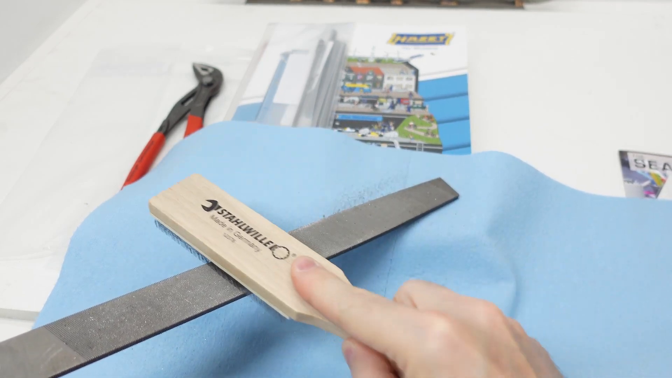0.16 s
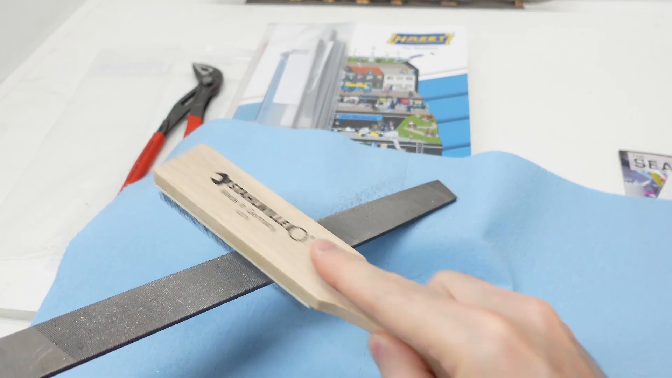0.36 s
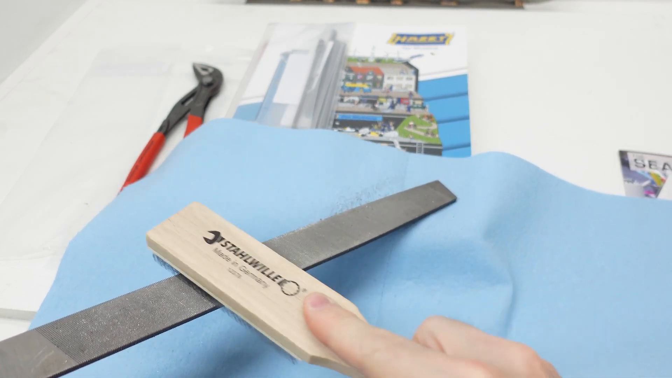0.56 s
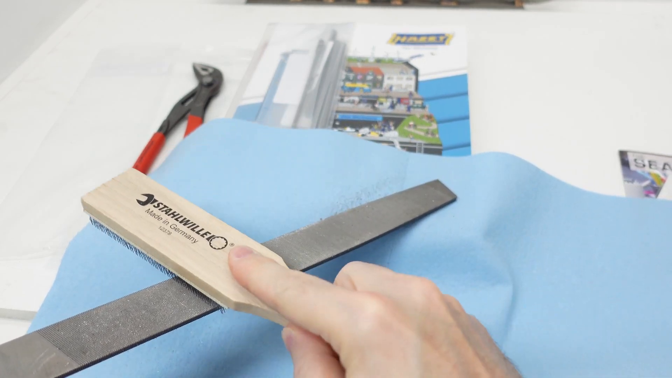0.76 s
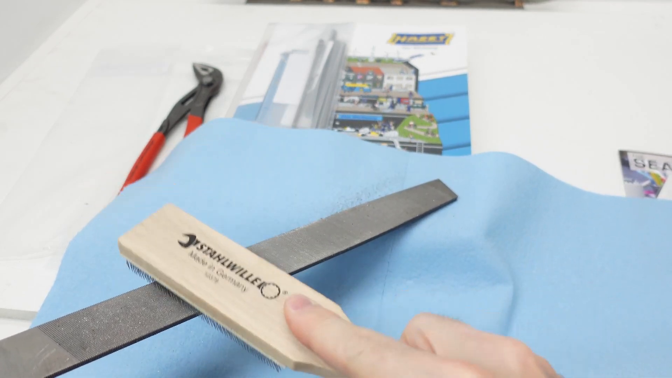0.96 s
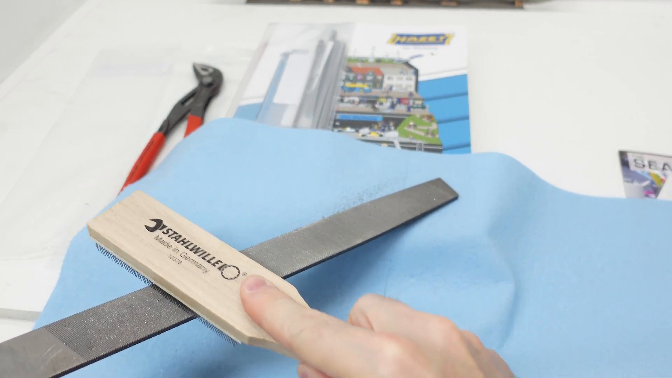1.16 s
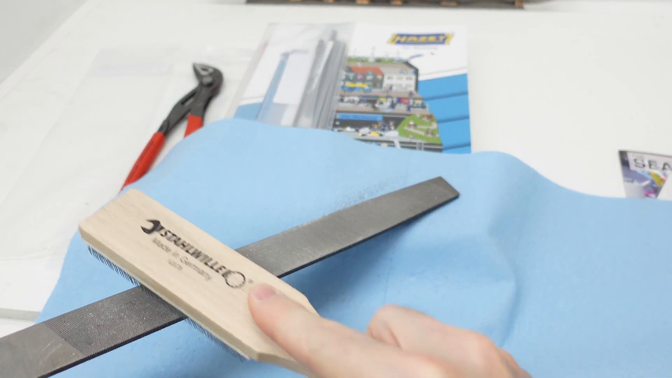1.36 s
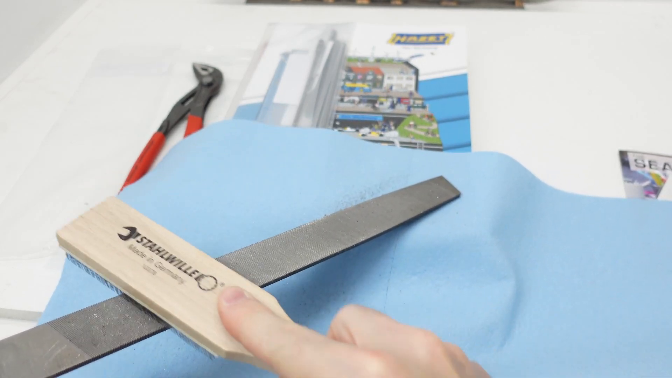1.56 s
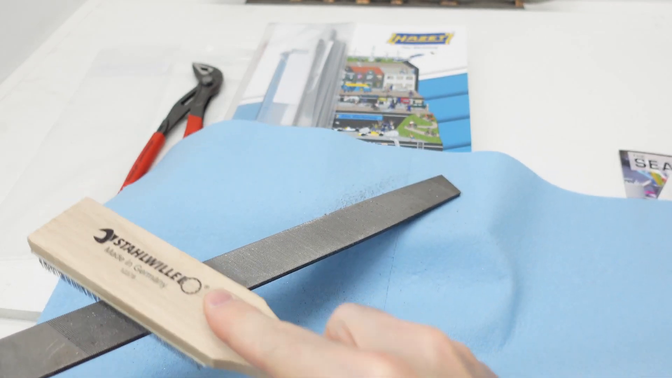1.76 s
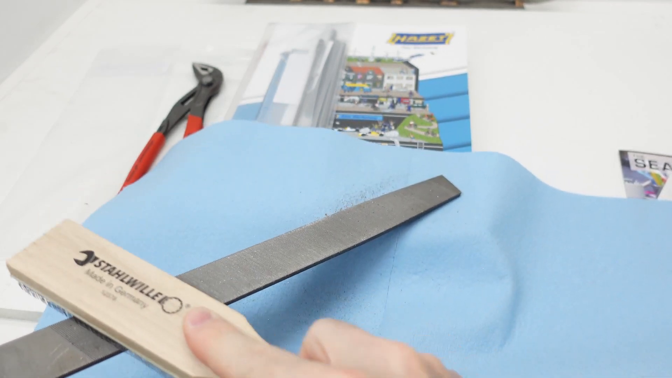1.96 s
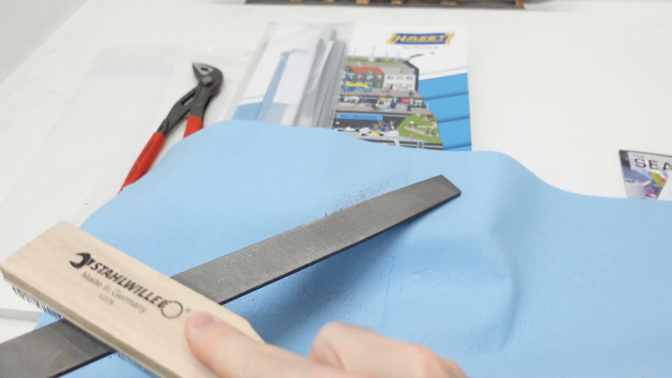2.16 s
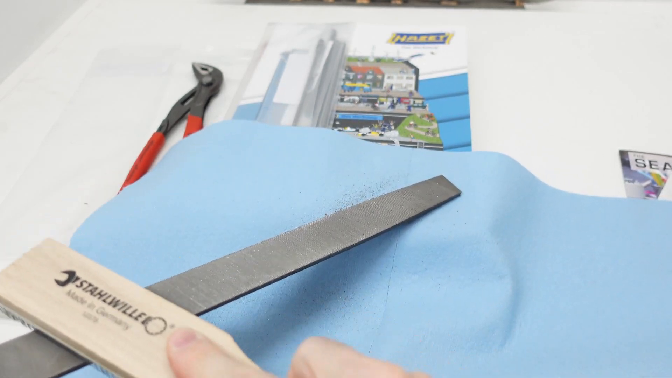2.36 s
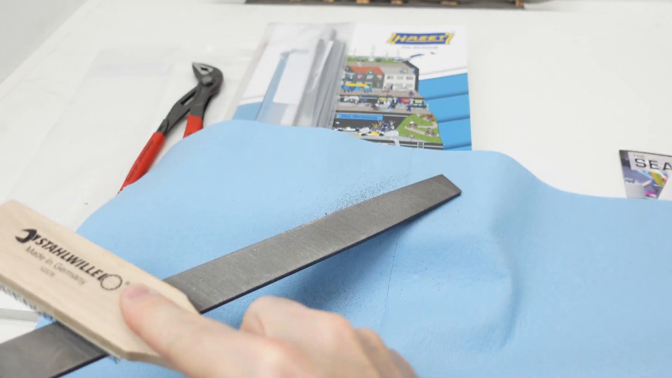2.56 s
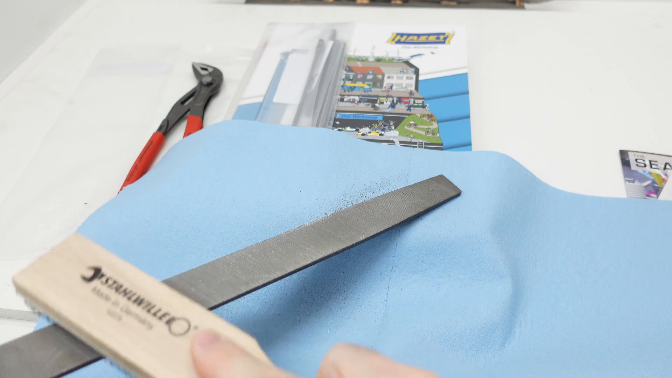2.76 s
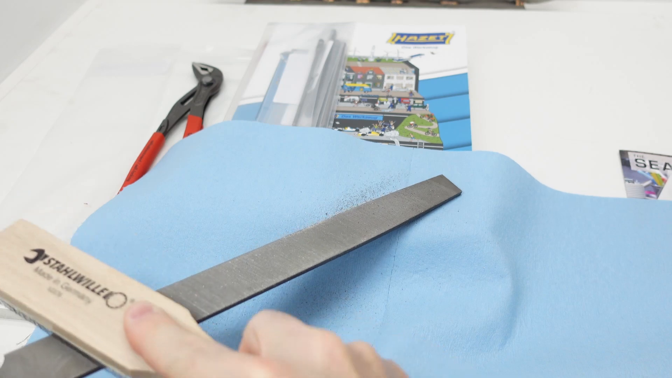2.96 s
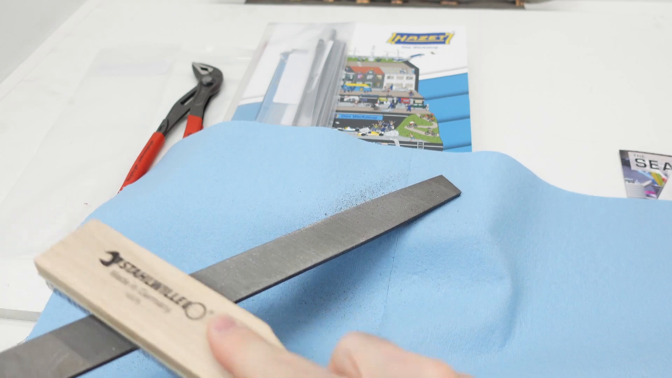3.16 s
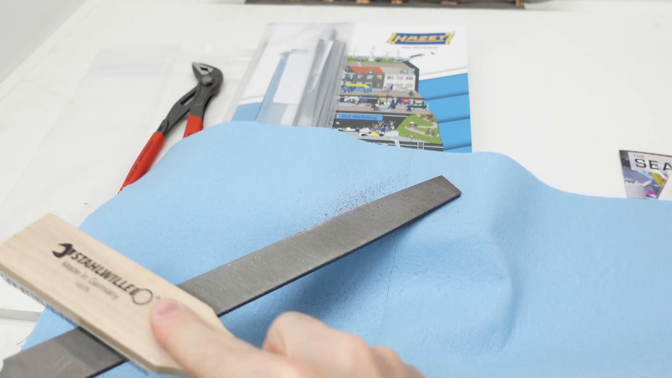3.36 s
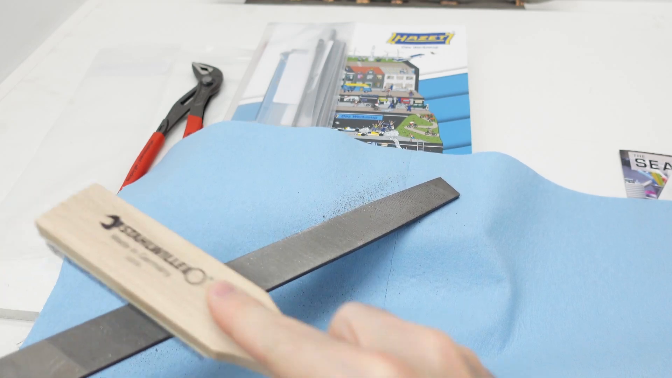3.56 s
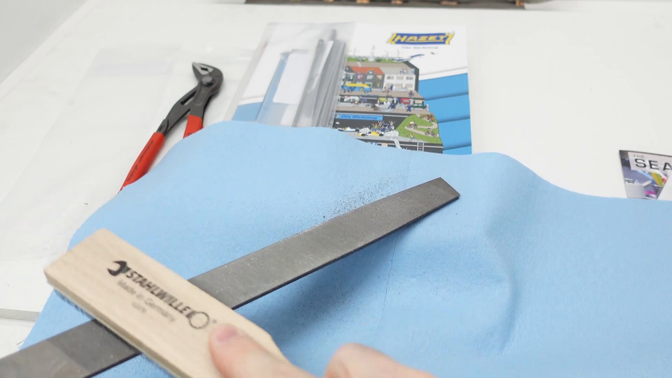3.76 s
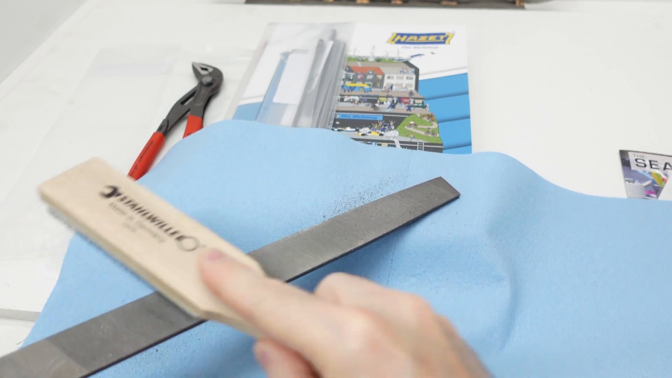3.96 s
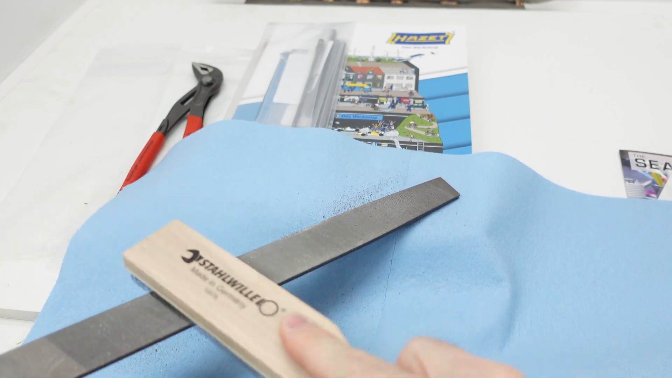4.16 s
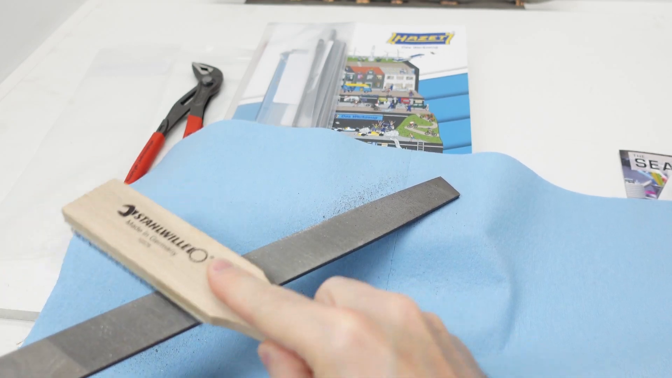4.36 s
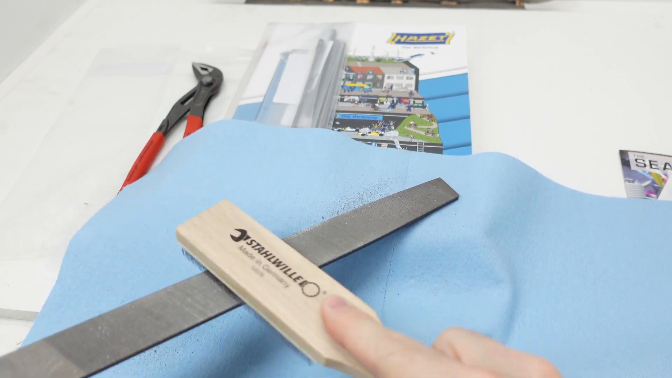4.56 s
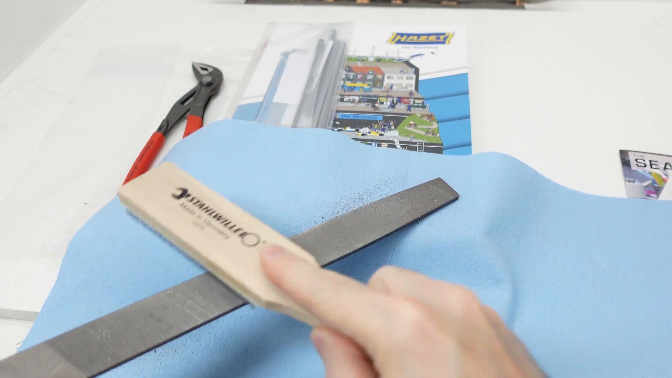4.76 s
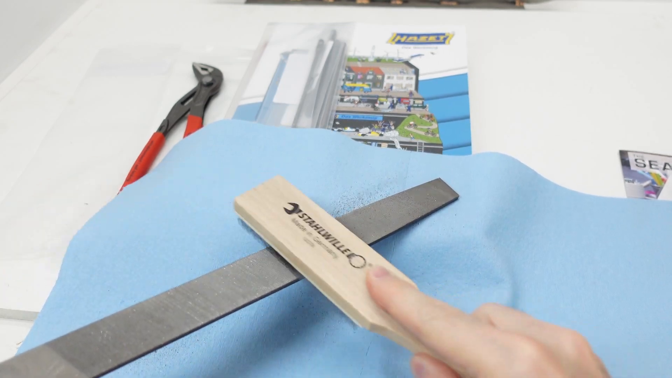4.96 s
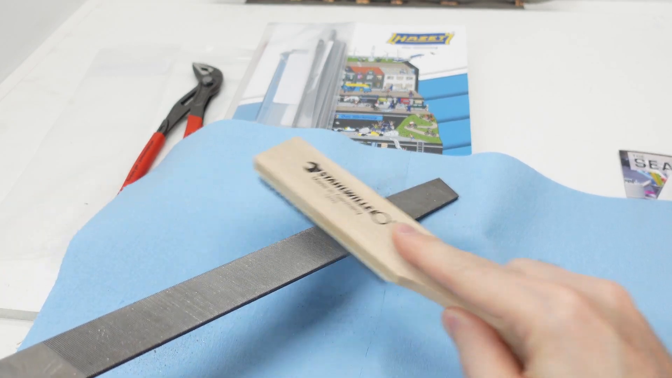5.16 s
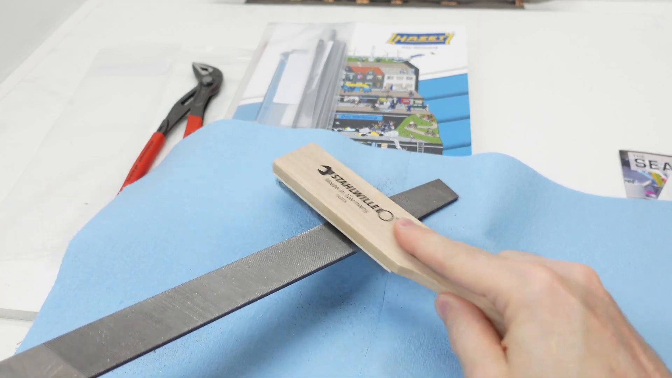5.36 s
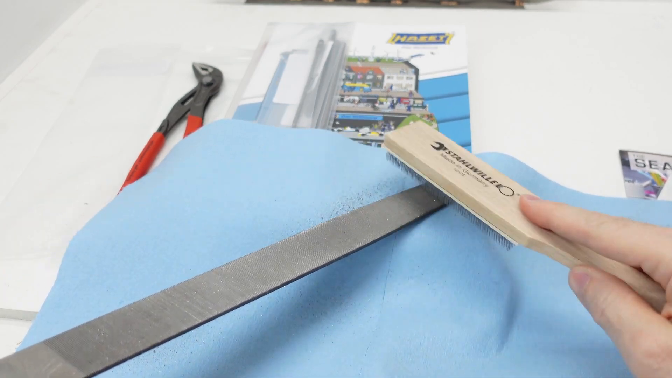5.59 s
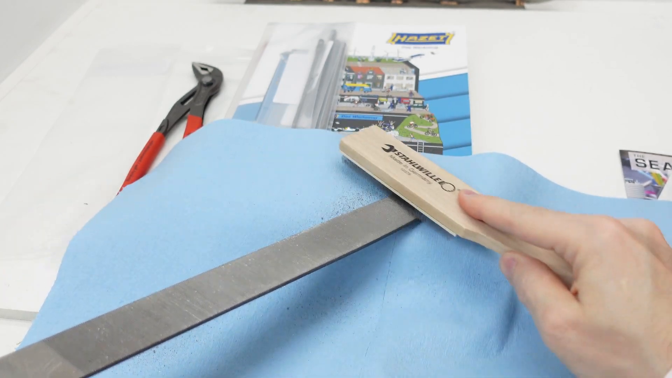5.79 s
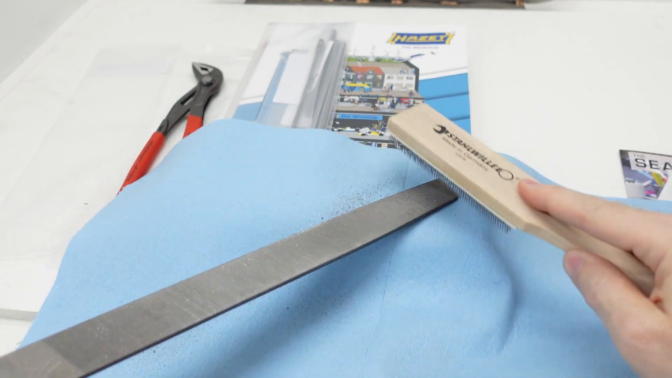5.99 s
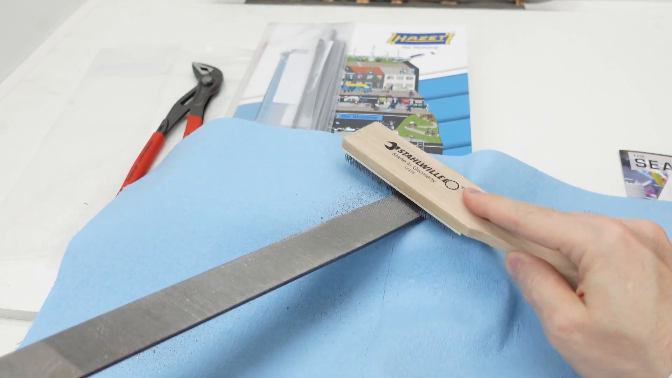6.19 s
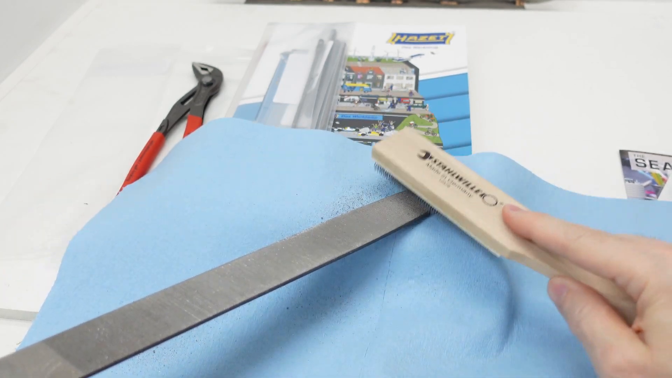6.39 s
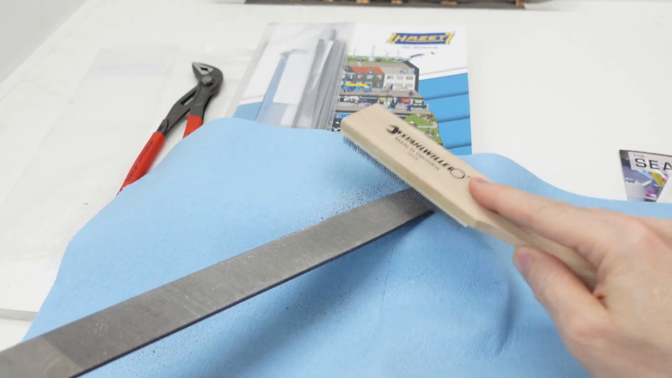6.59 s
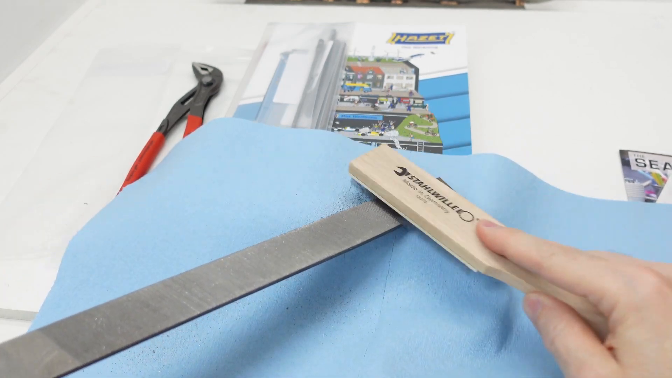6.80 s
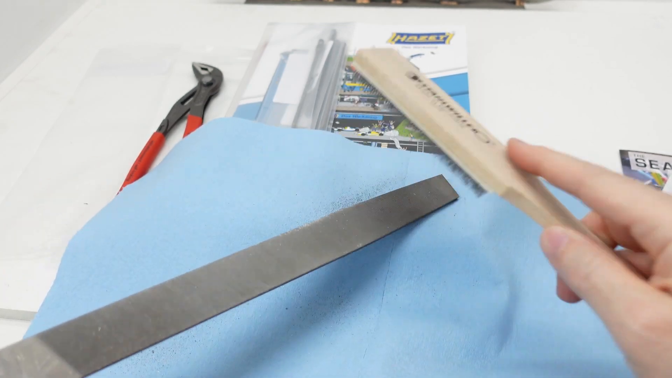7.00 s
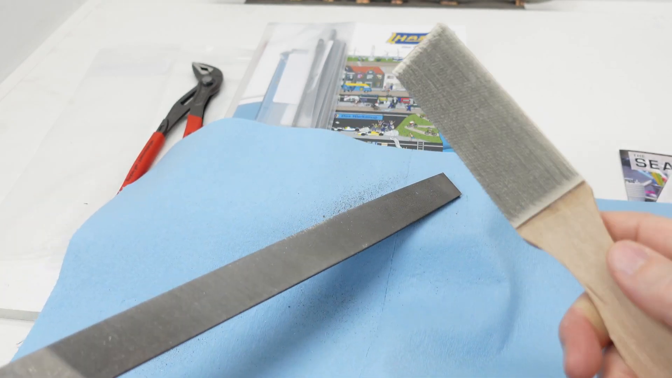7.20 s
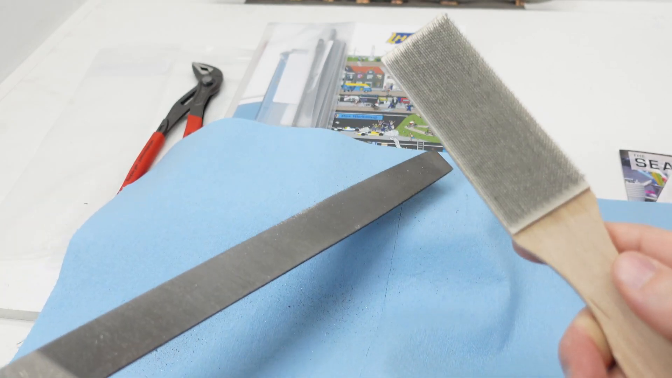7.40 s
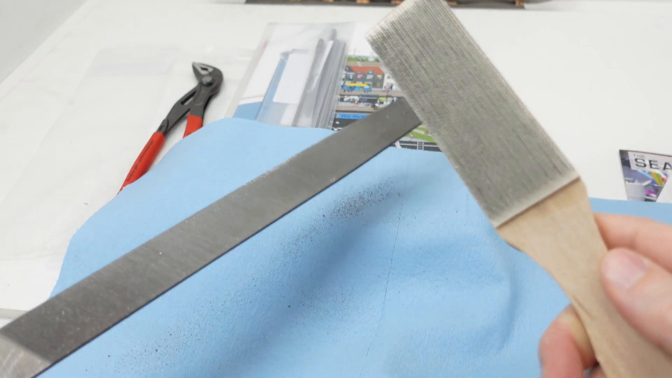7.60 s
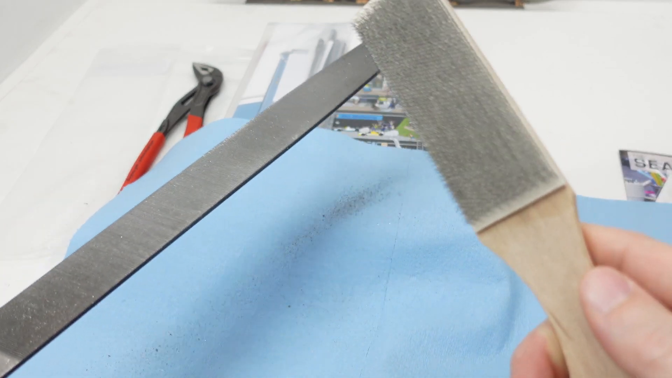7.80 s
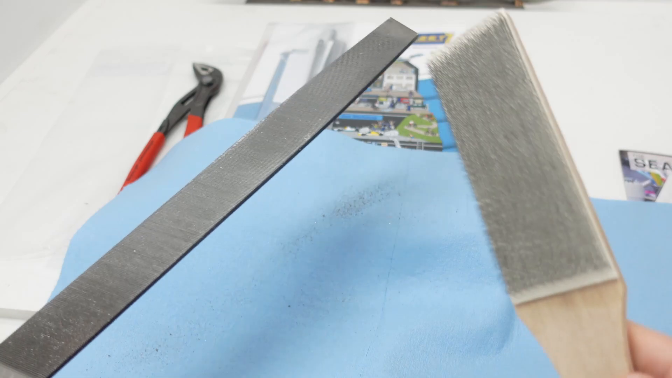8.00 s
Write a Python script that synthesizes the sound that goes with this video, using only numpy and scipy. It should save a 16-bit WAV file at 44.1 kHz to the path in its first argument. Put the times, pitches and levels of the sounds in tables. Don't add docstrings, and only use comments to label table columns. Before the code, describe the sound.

Close-miked wire brushing on a metal file: repeated raspy, bright scrapes of about a quarter second, each preceded by a low wooden tap through the bench. Sharp wire ticks and brief ringing steel colour some strokes. Later strokes near the file's tip are shorter, quieter in their scrape and more ringing, with hollower knocks. After the last one at about seven seconds, only soft handling rustles and low room air are heard.

```python
import sys
import numpy as np
from scipy import signal
from scipy.fft import rfft, irfft, next_fast_len
from scipy.io import wavfile
from scipy.ndimage import uniform_filter1d, map_coordinates

SR = 44100
rng = np.random.default_rng(int(sys.argv[2]) if len(sys.argv) > 2 else 0)


def to_linear_factor(level_db):
    exponent = np.asarray(level_db, float) / 20
    return 10 ** exponent


def materialize(psi):
    bounded = np.clip(np.atleast_2d(psi).T, -1, 1)
    quanta = np.round(bounded * 32767).astype(np.int16)
    wavfile.write(sys.argv[1], SR, quanta)


N = 354563
TIME = np.arange(N) / SR

# length_s, crest_db, crest_at (share of length), fade_db (crest to lift), lift_s
STROKES = [(0.3, -37, 0.75, 17, .015), (0.22, -34, 0.76, 6.5, 0.036), (0.24, -37.5, 0.53, 1.5, .045),
           (.25, -35, 0.59, 18.5, 0.018), (.18, -32.5, 0.72, 8.5, 0.053), (0.26, -32.5, 0.65, 10.5, 0.021),
           (.241, -32, 0.57, 17, 0.013), (0.24, -30.5, 0.59, 13.5, 0.0076), (0.21, -33, 0.55, 11, 0.0088),
           (0.196, -35.5, 0.42, 5.5, 0.0097), (.191, -36, 0.65, 14, 0.014), (.15, -43.5, 0.4, 10, 0.018),
           (0.13, -41.5, 0.45, 14, 0.033), (0.13, -42.5, 0.5, 8, 0.03), (0.12, -42.5, 0.45, 9.5, 0.048),
           (0.1, -42, .35, 9.5, 0.037), (0.085, -45.5, .4, 8, .03)]
# start_s, push_db, bend_db (re push), block_hz, block_db (re push)
LANDINGS = [(0.0272, -17, -13.5, 910, -11), (0.5754, -13, -15.5, 1047, -12), (1.039, -19.5, -9, 2000, -8),
            (1.4859, -18.5, -10, 580, -13), (1.9121, -16, -25, 990, -14.5),
            (2.3284, -19.5, -17.5, 650, -12), (2.842, -19.5, -13.5, 789, -8), (3.2635, -28, -14, 385, 6),
            (3.7468, -16.5, -23, 548, -15.5), (4.2194, -15.5, -16, 565, -24),
            (4.6088, -14.5, -12, 1040, -7), (4.9873, -15, -12.5, 1185, -4), (5.3298, -22, -7, 510, 6),
            (5.7291, -33, 11, 1150, 2.5), (6.1288, -23, 4.5, 1198, 14.5), (6.4863, -26, 7, 1194, 7.5),
            (6.8424, -29, -10, 480, 3)]
# time_s, place (0 heel, 1 middle, 2 upper, 3 tip)
PLACE = [(0, 1), (1.3, 1), (1.6, 0.35), (2, -0.05), (2.4, 0), (3.4, -3.5), (3.8, 0.36), (4.3, 1.07),
         (4.7, 0.93), (5.05, 1.5), (5.4, 3.5), (5.7, 4), (7, 9.5)]


def unit(x):
    return x / np.sqrt(np.mean(x ** 2) + 1e-20)


def along(points, hz):
    f, v = np.transpose(points)
    return np.interp(np.log(hz + 1), np.log(f + 1), v)


def wobble(rate_hz):
    knots = rng.standard_normal(int(N * rate_hz / SR) + 4)
    return map_coordinates(knots, [TIME * rate_hz])


def filtered(x, response):
    m = next_fast_len(len(x) + 8192)
    return irfft(rfft(x, m) * response(np.fft.rfftfreq(m, 1 / SR)), m)[:len(x)]


def resonance(f, hz, width_hz):
    return 1j * f * width_hz / (hz * hz - f * f + 1j * f * width_hz)


def patchy(x, depth_db):
    z = signal.stft(x, nperseg=256)[2]
    field = uniform_filter1d(rng.standard_normal(z.shape), 4, 0)
    field = unit(uniform_filter1d(field, 8, 1))
    return unit(signal.istft(z * to_linear_factor(depth_db * field), nperseg=256)[1][:N])


def slips(share, spread_db):
    chance, size, side = rng.random(N), rng.standard_normal(N), rng.random(N)
    return unit((chance < share) * to_linear_factor(spread_db * size) * np.sign(side - 0.5))


def place_at(t):
    return np.interp(t, *np.transpose(PLACE))


def stroke_clock(t):
    landed = np.array(LANDINGS)[:, 0]
    k = np.clip(np.searchsorted(landed, t) - 1, 0, None)
    since_s = t - landed[k]
    return k, since_s, np.clip(since_s / np.array(STROKES)[k, 0], 0, 1)


def air():
    # freq_hz, level_db (per Hz)
    air_spectrum = [(12, -65), (20, -24.5), (70, -18), (113, -6), (172, -6.5), (248, -12), (293, -3.5),
                    (377, -11.5), (485, -15), (527, -19.5), (759, -18.5), (923, -18), (2020, -28.5),
                    (2460, -30.5), (16000, -54)]
    noise = filtered(rng.standard_normal(N), lambda f: to_linear_factor(along(air_spectrum, f)))
    return to_linear_factor(-58 + 0.34 * wobble(3.7)) * patchy(noise, depth_db=0.4)


def landings():
    # freq_hz, level_db, t60_s
    bench_modes = [(157.8, -8.5, 0.16), (277, -2.5, 0.06)]
    # start_s, push_db, bend_db, block_hz, block_db
    rebounds = [(2.844, -36, -17, 1545, 7), (4.9877, -25, -14, 1650, 2), (5.3325, -25.5, -36, 1050, 7),
                (6.1295, -31, -19, 750, 13.5), (6.1305, -29, -18, 1640, 9), (6.4885, -33, -20, 560, 6)]
    out, t = np.zeros(N + SR), np.arange(SR // 6) / SR

    def ring(hz, db, t60_s):
        onset = 1 - np.exp(-t / 0.00091)
        return -to_linear_factor(db - 60 * t / t60_s) * np.sin(2 * np.pi * hz * t) * onset

    push = -np.sin(np.pi * np.minimum(t / 0.00073, 1)) ** 2
    push = filtered(push, lambda f: resonance(f, 450, 630))
    push = push / np.abs(push).max()
    knocks = LANDINGS + rebounds
    ticks = rng.standard_normal((len(knocks), len(t))) * to_linear_factor(-15.0 - 60 * t / 0.0095)
    grips = rng.standard_normal((len(knocks), 3))
    for (start_s, push_db, bend_db, block_hz, block_db), tick, grip in zip(knocks, ticks, grips):
        overhanging = place_at(start_s) > 3.1
        bench_db = bend_db + 3.5 - 13.5 * overhanging
        knock = push + ring(383 * (1 + 0.033 * grip[2]), bend_db, 0.058)
        knock = knock + ring(block_hz, block_db, 0.024)
        for k, (hz, level_db, t60_s) in enumerate(bench_modes):
            knock = knock + ring(hz * (1 + 0.045 * grip[k]), bench_db + level_db, t60_s)
        knock = knock + filtered(tick, lambda f: resonance(f, 6600, 9000) ** 2)
        out[round(start_s * SR):][:len(t)] += to_linear_factor(push_db) * knock
    return filtered(out[:N], lambda f: (1j * f / (85 + 1j * f)) ** 3)


def snaps():
    # start_s, peak_db, pitch_hz
    snap_events = [(0.0283, -28, 4190), (1.037, -26.5, 9000), (1.5075, -30.5, 9100), (1.737, -36, 11500),
                   (1.91, -35.5, 8200), (1.939, -48, 9000), (2.119, -35.5, 5000), (2.352, -46, 8800),
                   (2.8418, -19.5, 6300), (2.855, -30.5, 11500), (2.87, -22, 9500), (2.966, -25.5, 9500),
                   (3.0156, -15.5, 4100), (3.0794, -29.5, 6210), (3.271, -28, 6000), (3.293, -24.5, 6460),
                   (3.495, -28, 9000), (3.9544, -24.5, 7000), (4.409, -28, 6840), (4.6085, -33, 7000),
                   (5.125, -31, 7500), (5.129, -32, 4300), (6.129, -16, 2450), (7.035, -46, 2600),
                   (1.738, -35, 3520), (6.8415, -27, 5500), (7.149, -59, 11500), (7.168, -52, 2500),
                   (7.5678, -68, 6500), (7.8391, -61.5, 7500)]
    out, t = np.zeros(N + SR), np.arange(SR // 50) / SR
    for start_s, peak_db, pitch_hz in snap_events:
        def colour(f):
            ringing = 0.3 * resonance(f, pitch_hz, 4000) ** 2 + resonance(f, pitch_hz, 600)
            return ringing / (1 + (f / 14500) ** 8)

        burst = filtered(rng.standard_normal(len(t)) * to_linear_factor(-60 * t / 0.0067), colour)
        out[round(start_s * SR):][:len(t)] += to_linear_factor(peak_db) * burst / np.abs(burst).max()
    return out[:N]


def stroke_levels_db():
    k, since_s, done = stroke_clock(TIME)
    length_s, crest_db, crest_at, fade_db, lift_s = np.array(STROKES)[k].T
    reach = place_at(TIME)
    touch_db = -47.5
    to_rise_db = np.maximum(crest_db - touch_db, 0) * np.clip(1 - done / crest_at, 0, 1) ** 2.01
    faded_db = fade_db * np.clip((done - crest_at) / (1 - crest_at), 0, 1) ** 1.95
    steel_db = crest_db - to_rise_db - faded_db - 32 * np.maximum(since_s - length_s, 0) / lift_s

    bent = 1 - np.exp(-abs(since_s) / 0.022)
    fizz_db = 0.84 - 2.2 * np.clip(1 - reach, 0, 1) - 2.5 * np.clip(reach - 2, 0, 1)
    wire_db = fizz_db + 0.85 * to_rise_db * bent + 0.17 * faded_db

    thud_db = 14.5 * np.exp(-abs(since_s) / 0.0081)
    block_db = -8.5 + 0.5 * to_rise_db + 6.5 * np.clip(reach - 3, 0, 1) + thud_db
    return steel_db, wire_db, block_db


def hops_db():
    # from_s, to_s, drop_db
    hop_events = [(0.032, 0.047, -7), (1.489, 1.507, -28.5), (1.714, 1.741, -6), (1.924, 1.936, -12),
                  (2.334, 2.352, -10), (3.272, 3.291, -16), (3.751, 3.769, -5.5), (4.613, 4.622, -11),
                  (5.108, 5.119, -10), (6.848, 6.854, -5.5)]
    drop_db = sum(db * ((TIME > from_s) & (TIME < to_s)) for from_s, to_s, db in hop_events)
    return uniform_filter1d(drop_db * 1.0, size=90)


def bent_wires(x, low_width_hz, high_width_hz):
    # start_s, length_s, pitch_hz, lift_db
    tufts = [(.1, .05, 9500, 4), (.63, .05, 8900, 4), (.72, .05, 3200, 5), (2.5, .06, 2200, 4),
             (4.33, .04, 3000, 4), (4.71, .04, 2900, 4), (3.43, .06, 4400, 5), (3.9, .05, 4400, 4),
             (4.4, .02, 12000, 7), (5.75, .02, 2800, 10), (5.82, .04, 8700, 5), (6.54, .03, 3300, 5),
             (6.9, .03, 3300, 5)]
    hz, t, z = signal.stft(x, SR, nperseg=256)
    done, place = stroke_clock(t)[2], place_at(t)
    leaning = (t > 2.25) & (t < 4.1)
    tip = place > 3.1

    def glide(landing, lift):
        return landing + (lift - landing) * done

    def bump(centre_hz, width_hz):
        return np.exp(-((hz[:, None] - centre_hz) / width_hz) ** 2)

    low_hz = np.where(tip, glide(4300, 4480), glide(5150, 3900))
    low_hz = np.where(leaning, glide(3700, 4550), low_hz)
    high_hz = glide(8850, 9700)
    tilt = np.where(place > 2, glide(0.37, 0.18), glide(0.85, 0.22))
    lift_db = 9 * (1 - tilt) * bump(low_hz, low_width_hz) + 9.9 * tilt * bump(high_hz, high_width_hz)
    for start_s, length_s, pitch_hz, db in tufts:
        lift_db += db * bump(pitch_hz, 0.11 * pitch_hz) * np.exp(-((t - start_s) / length_s) ** 2)
    drift = uniform_filter1d(rng.standard_normal(z.shape), size=3, axis=0)
    drift = unit(uniform_filter1d(drift, size=28, axis=1))
    return signal.istft(z * to_linear_factor(lift_db + 1.9 * drift), SR, nperseg=256)[1][:N]


def file_ring(force):
    # freq_hz, width_hz, heel_db, middle_db, upper_db, tip_db
    file_modes = [(385, 37, 5.5, 13, 0, 19), (694, 770, -1, 0.5, 9, -1), (1150, 120, 3, 0.5, 4.5, 2.5),
                  (1788, 390, -6.5, -4.5, -7, -13), (2172, 190, 8, -1.5, -1.5, 11.5),
                  (2416, 170, -1.5, 6.5, 12, -12.5), (2800, 500, -0.5, -2.5, -9, -6),
                  (3130, 300, 2.5, 2.5, -19, 7.5), (3560, 430, -1.5, 1.5, -2, 0), (4100, 87, 4, 0.5, 15, 6),
                  (4322, 50, 1, -6, 6, 4.5), (4724, 110, -0.5, 2, 7, 4.5)]
    # freq_hz, width_hz, heel_db, middle_db, upper_db, tip_db
    bed_modes = [(5490, 560, -12.5, -2.5, -1, -2.5), (6300, 200, 6.5, -4.5, 3, 0.5),
                 (6810, 370, 3, -2.5, -2, -0.5), (7120, 260, 2.5, 0.5, 13.5, 5.5),
                 (8100, 890, 2.5, -5.5, 6.5, 1.5), (8550, 210, -1, 5, -12, 4), (9280, 150, -4, 2, -5, 8),
                 (9800, 1100, 2.5, -2, 1, -1), (11400, 380, -4.5, 2.5, 13, -6),
                 (13500, 200, 0.5, 2, 13, -5)]
    # freq_hz, width_hz, lift_db
    free_modes = [(2450, 46, 7.5), (4200, 31, 0), (4840, 35, 2.5), (6340, 45, 8), (8000, 28, 7.5)]
    place = np.clip(place_at(TIME), 0, 3)
    f = np.fft.rfftfreq(8192, 1 / SR)
    heard = np.zeros(N)
    for k in range(4):
        modes = [(hz, width_hz, db[k]) for hz, width_hz, *db in file_modes + bed_modes]
        modes += [(hz, width_hz, db * (k + 1) / 4) for hz, width_hz, db in free_modes]
        response = np.ones(len(f), complex)
        for hz, width_hz, db in modes:
            response *= 1 + (to_linear_factor(db) - 1) * resonance(f, hz, width_hz)
        near = np.sqrt(np.clip(1 - abs(place - k), 0, 1))
        heard += signal.oaconvolve(force * near, irfft(response)[:6000])[:N]
    return heard


def scrape():
    # freq_hz, level_db
    teeth_spectrum = [(1200, -25.5), (1900, -3.5), (3000, 1), (4500, -2.5), (5800, -1.5), (8000, -29.5)]
    # freq_hz, level_db
    wire_spectrum = [(3500, -31.5), (5000, 4), (6500, 2), (9000, -0.5), (10500, 0.5), (13000, -5.5),
                     (14500, -18.5), (16000, -22)]
    # freq_hz, level_db
    block_spectrum = [(200, -33.5), (400, -14.5), (700, -5), (1400, -0.5), (1900, -2), (2600, -17.5),
                      (5000, -69.5)]
    steel = filtered(slips(share=0.5, spread_db=3.0), lambda f: to_linear_factor(along(teeth_spectrum, f)))
    steel = patchy(steel, depth_db=1.5)
    wires = filtered(slips(share=0.23, spread_db=3.5), lambda f: to_linear_factor(along(wire_spectrum, f)))
    wires = patchy(wires, depth_db=1.0)
    block = unit(filtered(slips(share=0.6, spread_db=0.0), lambda f: to_linear_factor(along(block_spectrum, f))))

    steel_db, wire_db, block_db = stroke_levels_db()
    catch_db = 0.29 * wobble(40) + 0.55 * wobble(180)
    pressure = (stroke_clock(TIME)[1] > 0) * to_linear_factor(steel_db + hops_db() + catch_db)
    force = pressure * (steel + to_linear_factor(wire_db + 0.35 * wobble(120)) * wires + to_linear_factor(block_db) * block)
    force = bent_wires(force, low_width_hz=330, high_width_hz=800) + snaps()
    return to_linear_factor(-3.0) * file_ring(force)


def pings():
    # start_s, peak_db, pitch_hz
    ping_events = [(.324, -41.5, 2450), (1.735, -48, 2450), (4.416, -46, 2450), (4.797, -46, 2450),
                   (5.137, -43, 2450), (7.035, -62, 2290)]
    out, t = np.zeros(N + SR), np.arange(SR // 10) / SR
    rise_s, t60_s = 0.0036, 0.033
    shape = (1 - np.exp(-(t / rise_s) ** 2)) * to_linear_factor(-60 * t / t60_s)
    shape = shape / shape.max()
    for start_s, peak_db, pitch_hz in ping_events:
        out[round(start_s * SR):][:len(t)] += to_linear_factor(peak_db) * shape * np.sin(2 * np.pi * pitch_hz * t)
    return out[:N]


def handling():
    # peak_s, level_db, rise_s, fall_s
    rustles = [(.39, -67.5, .05, .035), (7.055, -76, .005, 0.061), (7.25, -62.5, 0.058, 0.025),
               (7.315, -71, .012, 0.038), (7.572, -68, .006, 0.038), (7.86, -76, .15, .12)]
    # freq_hz, level_db (per Hz)
    rustle_spectrum = [(900, -33), (1500, 1), (4000, -1), (8000, -7.5), (12000, -14.5), (15500, -25)]
    grains = filtered(slips(share=0.33, spread_db=-6.0), lambda f: to_linear_factor(along(rustle_spectrum, f)))
    swell = np.zeros(N)
    for peak_s, level_db, rise_s, fall_s in rustles:
        swell += to_linear_factor(level_db) * np.exp(-abs(TIME - peak_s) / np.where(TIME < peak_s, rise_s, fall_s))
    return swell * patchy(grains, depth_db=2.5)


def room(x):
    # freq_hz, t60_s
    room_decay = [(200, 0.34), (1500, 0.17), (5000, 0.44), (12000, 0.35)]
    hz, t, z = signal.stft(rng.standard_normal(SR // 2), SR, nperseg=256)
    decay = to_linear_factor(-60 * t / along(room_decay, hz)[:, None])
    tail = signal.istft(z * decay, SR, nperseg=256)[1]
    return signal.fftconvolve(np.pad(x, (300, 0)), tail / np.linalg.norm(tail))[:N]


def scene():
    knock = landings()
    rub = scrape() + pings() + handling()
    overhang = to_linear_factor(1.0 * place_at(TIME))
    echo = to_linear_factor(-29.5) * room(rub * overhang) + to_linear_factor(-16) * room(knock)
    return (air() + knock + rub + echo)[None]


def top_cut(x):
    return signal.sosfilt(signal.butter(12, 16690, fs=SR, output="sos"), x)


def record(dry):
    mix = filtered(dry[0], lambda f: 1 - 0.96 * np.clip((f - 15850) / 150, 0, 1))[None]
    return top_cut(mix)


dry = scene()
out = record(dry)
materialize(out)
```